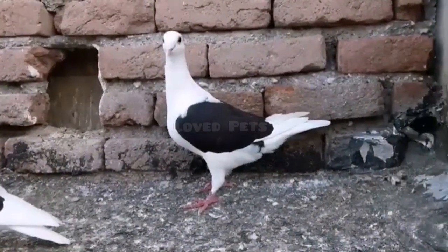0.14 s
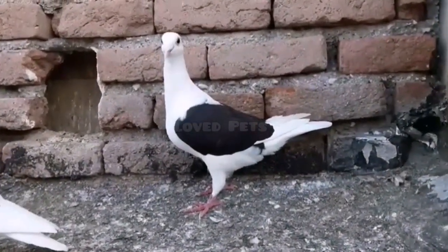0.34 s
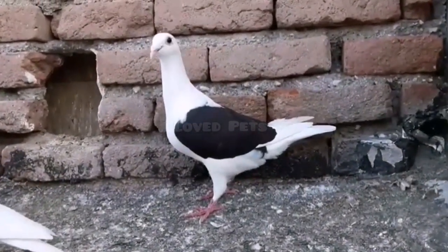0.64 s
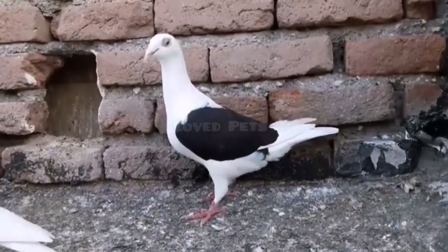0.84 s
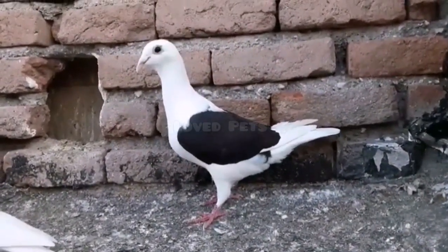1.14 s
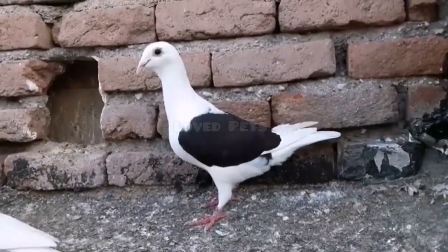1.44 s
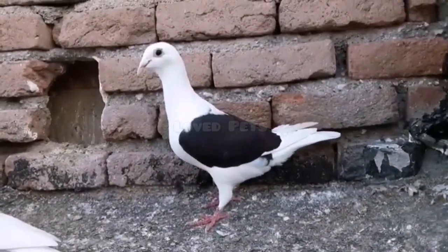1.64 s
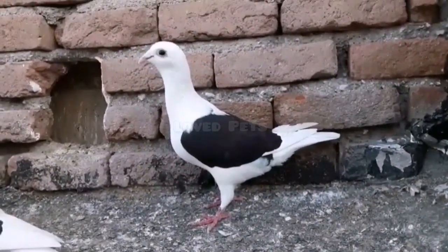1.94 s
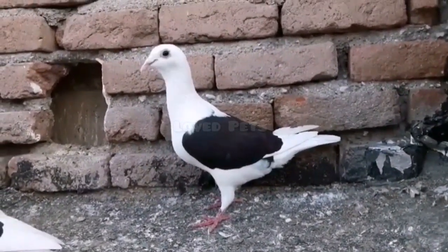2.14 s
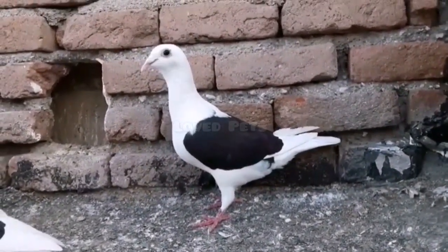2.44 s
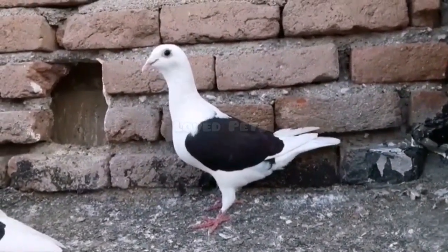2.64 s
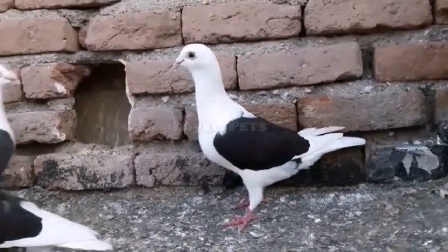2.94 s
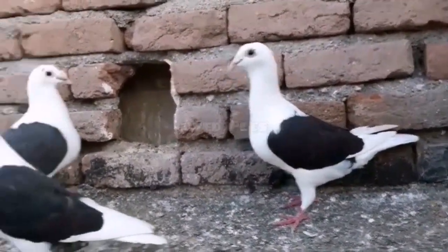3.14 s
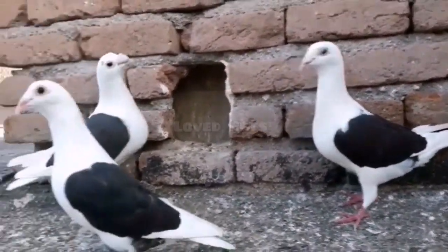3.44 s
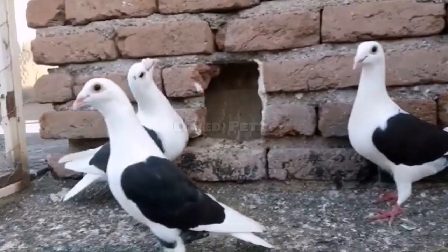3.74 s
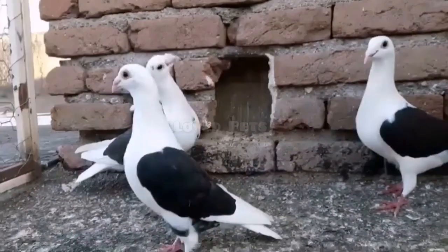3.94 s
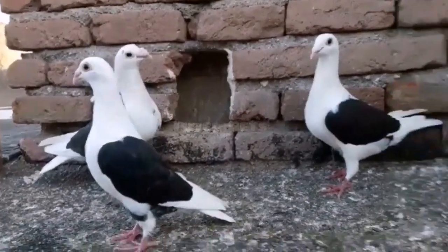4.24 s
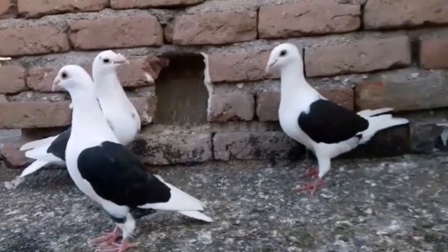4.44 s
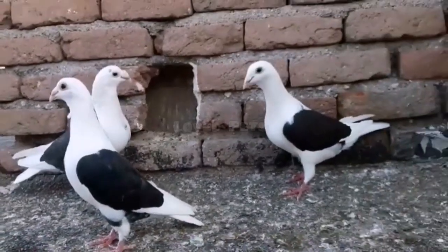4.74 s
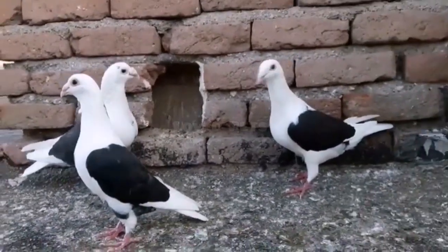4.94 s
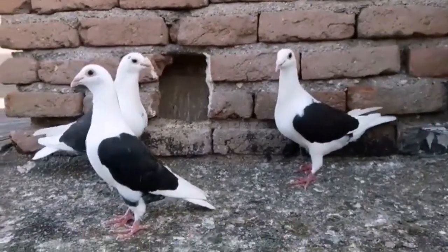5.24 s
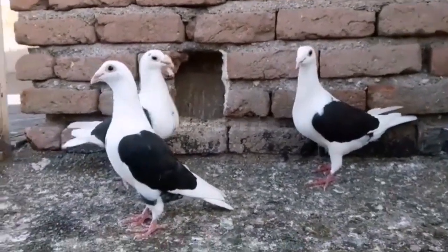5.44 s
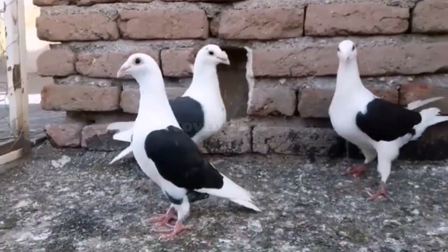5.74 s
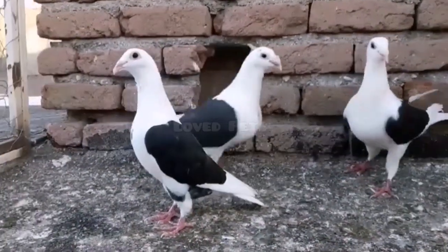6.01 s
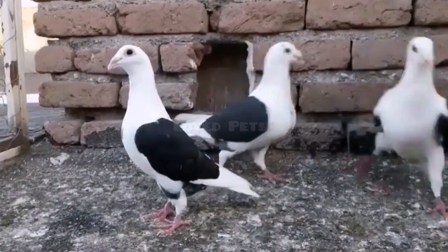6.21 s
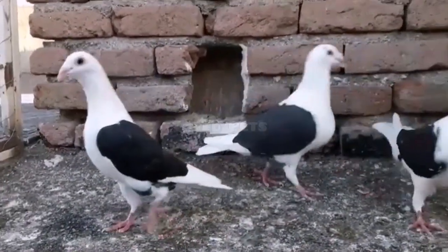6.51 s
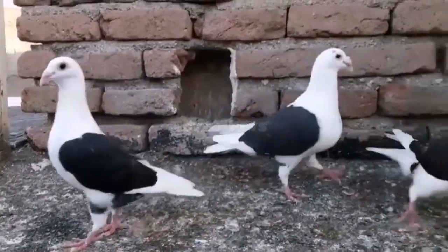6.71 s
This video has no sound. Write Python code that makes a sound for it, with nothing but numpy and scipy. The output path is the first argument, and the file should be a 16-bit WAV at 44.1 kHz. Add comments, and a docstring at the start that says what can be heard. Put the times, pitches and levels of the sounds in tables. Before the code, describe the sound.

An outdoor yard with faint town hiss, a soft low electrical hum and a distant chattering flock, heard through one wind-exposed microphone. From 0 to 0.8 s short throaty pigeon grunts come among sparrow chirps and faint far dove hoots. Gritty foot ticks cluster around 0.9-1.05 s as a clear low note glides, then a throbbing coo rolls from 1.05 to 1.8 s, with a small wind bump near 1.4. Grunts follow at 1.8-2.9 s, with a gliding note around 2.4 and a faint distant whine. A strong rolling coo fills 3.0-3.6 s. Wind thuds and slaps rise from 3.6, heaviest near 4.8 and 5.7. Softer rolls come at 4.7, 5.4-5.95 and 6.3-6.6 s, with a stout grunt at 6.15. Sparrows chirp throughout; a tiny nasal squeak and a grit scratch close near 6.8 s.

```python
"""Pigeons coo by a brick wall: throbbing tones roll, clear tones glide, short puffs grunt and far doves hoot.
Swept whistles make sparrow chirps and, scattered at random, a chattering flock behind them.
Grit ticks under small feet as bursts of noise; a sine hums like a transformer, a far whine and a squeak pass.
Gusts of wind buffet a single microphone as swelling low noise and sharp slaps, over the hiss of a far town."""
import sys
import numpy as np
from scipy import signal
from scipy.fft import rfft, irfft, next_fast_len
from scipy.io import wavfile
from scipy.ndimage import uniform_filter1d, map_coordinates

SR = 44100
rng = np.random.default_rng(int(sys.argv[2]) if len(sys.argv) > 2 else 0)


def store_wav(level_fs):
    """Save 16-bit WAV to argv[1]."""
    pcm = np.round(np.clip(np.atleast_2d(level_fs), -1, 1) * 32767)
    wavfile.write(sys.argv[1], SR, pcm.T.astype(np.int16))


N = 302967
T = np.arange(N) / SR


def amp(db):
    """Gain of a dB value."""
    return 10 ** (np.asarray(db) / 20)


def unit(x):
    """Scaled to rms 1."""
    return x / np.sqrt(np.mean(x ** 2) + 1e-20)


def curves(rows, t=T):
    """One value per sample for each column after the time."""
    s, *cols = np.transpose(rows)
    return [np.interp(t, s, c) for c in cols]


def wobble(rate, size=N):
    """A smooth random curve through rate knots a second."""
    knots = rng.standard_normal(int(size * 200 / SR) + 4)
    return map_coordinates(knots, [np.arange(size) * rate / SR])


def smooth_noise(size, width):
    """Random jitter of rms 1, averaged over width samples."""
    return unit(uniform_filter1d(rng.standard_normal(size), size=width))


def filtered(x, response):
    """x times a response of frequency."""
    m = next_fast_len(len(x) + 8192)  # silence at the end keeps the filter from wrapping round
    return irfft(rfft(x, m) * response(np.fft.rfftfreq(m, 1 / SR)), m)[:len(x)]


def shape(points):
    """Gain curve through (f/Hz, level/dB) points joined on a log axis."""
    f, db = np.transpose(points)
    return lambda hz: amp(np.interp(np.log(hz + 1), np.log(f + 1), db))


def noise(points):
    """Coloured noise of rms 1."""
    return unit(filtered(rng.standard_normal(N), shape(points)))


def add(track, s, sound):
    """Mixes a sound into a track at s seconds."""
    part = track[round(s * SR):][:len(sound)]
    part += sound[:len(part)]


def span(rows, fade):
    """Times of a call and its soft edges, fade seconds long."""
    t = np.arange(rows[0][0], rows[-1][0], 1 / SR)
    return t, np.clip(np.minimum(t - t[0], t[-1] - t) / fade, 0, 1)


def tone(hz):
    """A sine of rms 1 that follows a pitch curve."""
    return np.sqrt(2) * np.sin(2 * np.pi * (np.cumsum(hz) / SR + rng.random()))


def echoes(x, t60, wet_db):
    """The sound plus a noise tail that decays by 60 dB in t60 seconds, as walls return it."""
    t = np.arange(SR // 2) / SR
    tail = rng.standard_normal(len(t)) * amp(-60 * t / t60) * (t > .004)
    return x + amp(wet_db) * signal.fftconvolve(x, tail / np.linalg.norm(tail))[:len(x)]


def swells(rows, edge):
    """Summed gain of (middle, half length, dB) bumps; a higher edge makes them steeper."""
    return sum(amp(db) * np.exp(-np.abs((T - s) / half) ** edge) for s, half, db in rows)


def chirp(length, first_hz, last_hz):
    """A whistle; the wider its sweep, the hoarser it warbles."""
    u = np.linspace(0, 1, int(length * SR))
    hoarse = .55 + 1.5 * abs(np.log(last_hz / first_hz))
    warble = 1 + hoarse * (.015 * wobble(160, len(u)) + .033 * smooth_noise(len(u), 70))
    rasp = unit(amp(3 * hoarse * wobble(190, len(u))))
    envelope = np.sin(np.pi * u) ** 0.51 * amp(-4.5 * hoarse * u ** 3)
    return envelope * rasp * tone((first_hz + (last_hz - first_hz) * u) * warble)


def notes(calls, waver, tremor_db, wet_db):
    """Clear notes: one nearly pure, slightly wavering tone each, with echo."""
    out = np.zeros(N)
    for rows in calls:
        t, edge = span(rows, fade=0.0055)
        hz, db = curves(rows, t)
        level = edge * amp(db + tremor_db * wobble(55.0, len(t)))
        add(out, t[0], level * tone(hz * (1 + waver * wobble(30.34, len(t)))))
    return echoes(out, t60=0.46, wet_db=wet_db)


# gusts on the microphone: middle t/s, half length t/s, push level/dB, flutter level/dB relative to the push
GUSTS = [(0.26, 0.056, -36.5, -36), (1.29, 0.037, -36, -16), (1.442, 0.052, -28, -15),
         (1.683, 0.082, -38, -36), (3.14, 0.11, -39.5, -30), (3.62, 0.094, -32, -8.5),
         (3.914, 0.098, -22, -12.5), (4.103, 0.076, -22.5, -18.5), (4.328, 0.093, -31.5, -7),
         (4.563, 0.054, -20, -12.5), (4.784, 0.06, -14, -11), (5.099, 0.023, -25.5, -32),
         (5.345, 0.05, -25.5, -13), (5.665, 0.02, -15, -16), (5.757, 0.056, -21, -21),
         (5.885, 0.06, -20, -13), (6.261, 0.065, -25, -29), (6.38, 0.021, -36, -28),
         (6.521, 0.048, -26.5, -10), (6.633, 0.049, -22, -14.5), (6.805, 0.049, -30.5, -28)]
# single slaps of air on the diaphragm: t/s, peak level/dB
SLAPS = [(1.436, -30), (3.851, -30), (4.0356, -20.5), (4.0979, -26.5), (4.622, -18.5), (4.733, -27),
         (4.7696, -15.5), (4.7933, -13.5), (5.149, -25), (5.255, -17.5), (5.261, -19), (5.701, -9),
         (5.88, -31)]
# breeze between the gusts: t/s, level/dB
BREEZE = [(0, -43), (1.0, -39), (1.8, -40.5), (2.4, -41), (3.4, -41.5), (3.8, -42), (5.2, -33),
          (6.87, -39.5)]
# spectrum of the slow push, relative: f/Hz, level/dB per Hz
BUFFET = [(15, -18.5), (35, 4.5), (55, 1.5), (90, -9.5), (140, -25), (300, -82)]
# spectrum of the faster flutter, relative: f/Hz, level/dB per Hz
FLUTTER = [(50, -46), (90, -0.5), (130, -1.5), (200, -7.5), (350, -24), (700, -40), (1500, -62),
           (4000, -92)]
GUST_EDGE = 3.5  # steepness of a gust's rise and fall
BREEZE_FLUTTER_DB = -12.5  # relative to the breeze
SLAP_S, SHAKE_S, SHAKE_DB = 0.0013, 0.022, -13.5  # width of a slap; half length and gain of its flutter


def wind():
    """Eddies push the diaphragm in lumps; faster flutter rides on gusts and shakes around single slaps."""
    breeze = amp(curves(BREEZE)[0])
    strength = breeze + swells([row[:3] for row in GUSTS], GUST_EDGE)
    sharp = amp(BREEZE_FLUTTER_DB) * breeze
    sharp = sharp + swells([(s, half, db + rel_db) for s, half, db, rel_db in GUSTS], GUST_EDGE)
    sharp = sharp + swells([(s, SHAKE_S, db + SHAKE_DB) for s, db in SLAPS], 0.95)

    lumps_db = 4.7 * wobble(18)
    eddies = noise(BUFFET)
    # dividing by the swing evens out the diaphragm's flapping
    swing = np.abs(signal.hilbert(eddies, next_fast_len(N))[:N]) + .3
    push = unit(eddies / swing ** 0.43 * amp(0.32 * lumps_db))
    flutter = unit(noise(FLUTTER) * amp(0.63 * lumps_db + 3.1 * wobble(45)))

    slaps, t = np.zeros(N), np.arange(-SR // 50, SR // 50) / SR
    u = t / SLAP_S
    pulse = -(1 - u * u) / (1 + u * u) ** 2 * np.hanning(len(t))
    for s, peak_db in SLAPS:
        add(slaps, s + t[0], amp(peak_db) * pulse)
    return strength * push + sharp * flutter + slaps


# far town and air, relative spectrum: f/Hz, level/dB per Hz
YARD = [(65, -49), (110, -7.5), (149, -16), (280, -12), (373, -10.5), (466, -17), (759, -24), (2180, -31),
        (4100, -29), (7710, -39.5), (13100, -43.5), (14200, -43)]
YARD_DB = -50.5  # rms, give or take a tiny drift


def yard():
    """The far town: hiss in shifting patches of time and pitch, at an almost steady level."""
    z = signal.stft(noise(YARD), nperseg=512)[2]
    across_pitch = uniform_filter1d(rng.standard_normal(z.shape), size=7, axis=0)
    patches = unit(uniform_filter1d(across_pitch, size=8, axis=1))
    hiss = signal.istft(z * amp(2.3 * patches), nperseg=512)[1][:N]
    return amp(YARD_DB + 0.043 * wobble(1.52)) * unit(hiss)


# transformer hum, before its drift: f/Hz, level/dB rms
HUM = [(99.5, -46)]


def hum():
    """A mains line: one sine, slightly unsteady in pitch and level."""
    return sum(amp(db + 2.4 * wobble(12)) * tone(hz * (1 + 0.0054 * wobble(2.99))) for hz, db in HUM)


# chattering flock: t/s, low chatter level/dB, high chatter level/dB
FLOCK = [(0.0, -61.5, -64.5), (6.1, -62.5, -69), (6.87, -59.5, -54.5)]


def chatter(level_db, centre_hz, spread, fall, count):
    """Many far birds at random moments, each call falling in pitch, with strong echo."""
    out = np.zeros(N)
    for when, pitch, size, length in rng.random((count, 4)):
        hz = centre_hz * (1 + spread * (2 * pitch - 1))
        call = chirp(.025 + .05 * length, hz * (1 + fall), hz * (1 - fall))
        add(out, when * N / SR, amp(12 * size) * call)
    return amp(level_db) * unit(echoes(out, t60=.3, wet_db=-2))


def flock():
    """Low falling calls and high, nearly level peeps."""
    low_db, high_db = curves(FLOCK)
    low = chatter(low_db, 3850, .12, 0.1185, count=220)
    return low + chatter(high_db, 5600, 0.14, 0.039, count=200)


# grit ticks: t/s, scratch level/dB before its fade, knock level/dB relative to the scratch, scratch centre f/Hz
TICKS = [(0.029, -49, -21, 6300), (0.396, -52.5, 8, 5860), (0.87, -44.5, -18, 6350),
         (0.9795, -37.5, -2, 6200), (0.9805, -47, -11, 12500), (0.996, -38, -6, 6100),
         (1.05, -47, -17, 6240), (1.343, -52, -17, 6350), (2.5234, -53.5, -4, 9640),
         (2.8893, -58, -2, 8360), (3.542, -60.5, 15.5, 6570), (3.705, -55.5, 10.5, 8100),
         (4.301, -55, 11, 6250), (4.553, -58, 15.5, 7200), (4.7, -48, -16, 3900), (4.9446, -54.5, 6, 12000),
         (5.3585, -54, 7, 7320), (5.5883, -41.5, -1, 5800), (5.7931, -52, 5, 11800),
         (6.8498, -44.5, 8, 10800), (6.848, -36, -18, 1300)]
# shuffle of feathers and feet, before its flicker: middle t/s, half length t/s, level/dB
RUSTLE = [(.02, 0.045, -57.5), (.9, 0.039, -53.5), (1.012, 0.034, -47.5), (3.42, 0.28, -56),
          (5.48, 0.024, -55), (5.615, 0.032, -53), (6.81, 0.082, -53.5)]
# spectrum of shuffle and faint grains, relative: f/Hz, level/dB per Hz
GRIT = [(900, 9.5), (1800, 3.5), (3000, 5), (6000, 2.5), (10000, -6), (14000, -11.5)]
STIR_DB = -72.5  # constant faint stirring, before its flicker


def ticks():
    """Grit scratches around its own pitch with a duller knock; feet shuffle, and faint grains fall by chance."""
    out, t = np.zeros(N), np.arange(SR // 8) / SR
    for s, db, body_db, hz in TICKS:
        scratch = filtered(rng.standard_normal(len(t)), lambda f: 1 / (1 + ((f - hz) / (0.17 * hz)) ** 2))
        dull = shape([(500, 3), (1100, 6.5), (2600, 8.0), (8000, -8.5)])
        knock = filtered(rng.standard_normal(len(t)), dull)
        fade = amp(db - 60 * t / 0.068) * (1 - np.exp(-t / 0.002))
        add(out, s, fade * (unit(scratch) + amp(body_db) * unit(knock)))

    flicker_db = 2.1 * wobble(120) + 2.7 * smooth_noise(N, 40)
    shuffle = (amp(STIR_DB) + swells(RUSTLE, edge=1.3)) * amp(flicker_db)
    for when, size in rng.random((90, 2)):
        grain = np.exp(-((t - .02) / .005) ** 2)
        add(shuffle, when * N / SR, amp(-72 + 15 * size ** 3) * grain)
    return out + shuffle * noise(GRIT)


# sparrow chirps: t/s, length t/s, first f/Hz, last f/Hz, level/dB before envelope and echo
CHIRPS = [(0.017, 0.091, 4240, 3340, -54), (0.316, 0.059, 6100, 6150, -56), (0.692, 0.082, 4600, 3230, -48),
          (0.796, 0.066, 5910, 4800, -53), (0.855, 0.074, 4270, 3800, -57),
          (1.187, 0.041, 6030, 6130, -51.5), (1.186, 0.022, 5700, 5600, -51),
          (1.266, 0.013, 5530, 5670, -50), (1.32, 0.093, 4340, 3870, -56.5),
          (1.416, 0.051, 6030, 6590, -54.5), (1.651, 0.091, 4530, 3310, -60),
          (1.903, 0.035, 4300, 4100, -62), (1.485, 0.086, 4680, 3070, -49), (2.22, 0.078, 4580, 3200, -45),
          (2.228, 0.048, 5660, 4920, -50.5), (3.056, 0.092, 4690, 2880, -48.5),
          (3.38, 0.06, 5780, 4200, -49.5), (3.47, 0.034, 3700, 4500, -54),
          (3.818, 0.066, 4540, 3165, -49.5), (4.18, 0.029, 4210, 3580, -56),
          (4.466, 0.072, 4300, 3460, -56), (4.755, .012, 5860, 5670, -56),
          (4.724, 0.063, 4400, 3280, -52.5), (5.065, 0.023, 4970, 5230, -58),
          (5.084, 0.086, 4200, 3400, -57.5), (5.23, 0.024, 6150, 6200, -57),
          (5.388, 0.048, 5440, 5780, -52), (5.433, 0.031, 4310, 4010, -50),
          (5.511, 0.079, 4370, 3260, -48.5), (5.682, 0.11, 4340, 2810, -61), (5.88, 0.042, 6400, 6400, -63),
          (5.912, 0.044, 5600, 5000, -63), (5.986, 0.055, 5800, 5700, -64), (6.06, .015, 5500, 4900, -55),
          (6.192, .05, 4300, 3280, -60), (6.046, 0.074, 4390, 3170, -56), (6.307, 0.086, 4680, 2930, -49),
          (6.383, 0.031, 3890, 4100, -51), (6.5, 0.027, 6090, 6230, -56), (6.619, 0.044, 5900, 6480, -57.5),
          (6.761, 0.049, 5820, 5060, -58), (6.817, 0.048, 4200, 3980, -50)]


def sparrows():
    """The nearer birds, blurred by the walls of the yard; high chirps ring shorter."""
    out = np.zeros(N)
    for s, length, first_hz, last_hz, db in CHIRPS:
        call = np.pad(chirp(length, first_hz, last_hz), (0, SR // 2))  # room for the echo
        ring_s = .4 * (3800 / max(last_hz, 3800)) ** 3
        add(out, s, amp(db) * echoes(call, t60=ring_s, wet_db=-2.5))
    return out


# short grunts: t/s, level/dB at the height of the puff before echo, starting f/Hz
GRUNTS = [(0.238, -47.5, 394), (0.44, -48.5, 377), (0.608, -45.5, 420), (0.671, -46, 244),
          (0.784, -48, 413), (1.811, -44.5, 357), (1.857, -56, 353), (2.02, -44, 392), (2.158, -37.5, 279),
          (2.186, -46, 390), (2.531, -42.5, 400), (2.573, -47, 359), (2.642, -47, 302), (2.676, -42.5, 376),
          (2.882, -38.5, 384), (5.329, -42.5, 373), (5.979, -44, 406), (6.161, -36, 325)]


def grunts():
    """One puff of breath rings the throat for a few cycles, sinking in pitch."""
    out, t = np.zeros(N), np.arange(SR // 10) / SR
    u = t / 0.0048  # the puff peaks after 4.8 ms
    for s, db, hz in GRUNTS:
        add(out, s, amp(db) * u * np.exp(1 - u) * tone(hz * (1 - 1.7 * t)))
    return echoes(out, t60=0.23, wet_db=0.5)


# hoots of far doves: t/s, length t/s, nominal f/Hz, level/dB before tremor and echo
HOOTS = [(.3, 0.049, 514, -58), (.39, 0.11, 512, -54.5), (1.89, 0.071, 519, -55), (1.95, 0.15, 603, -58.5),
         (2.95, 0.11, 511, -52), (3.48, 0.054, 538, -55), (3.58, 0.11, 519.4, -55),
         (3.84, 0.063, 590, -55.5), (4.18, 0.12, 580, -56.5), (5.1, .12, 504, -56),
         (6.13, 0.11, 526, -55.5), (6.52, 0.15, 561, -60), (6.68, 0.047, 569, -58),
         (6.72, 0.19, 519, -57.5)]


def doves():
    """Each hoot sinks from a tenth above its nominal pitch to just below it."""
    calls = [[(s, 1.1 * hz, db), (s + length, .985 * hz, db)] for s, length, hz, db in HOOTS]
    return notes(calls, waver=.012, tremor_db=1.5, wet_db=-8)


# clear gliding notes of near pigeons, one list a note: t/s, f/Hz, level/dB, before waver, tremor and echo
GLIDES = [
    [(.9, 268.5, -43), (.95, 235.2, -41.5), (1.0, 273.4, -43.5), (1.08, 278.6, -43), (1.13, 233.3, -44.5),
     (1.19, 317, -49), (1.26, 335, -42)],
    [(1.66, 302.8, -50), (1.74, 259.5, -49.5), (1.83, 207, -50)],
    [(2.31, 260, -44), (2.35, 238, -40), (2.39, 241, -39), (2.43, 296.5, -41.5), (2.49, 295, -40.5),
     (2.55, 212, -50)],
    [(2.88, 363.3, -49), (2.93, 322.6, -39), (3.0, 291.5, -42), (3.08, 257.5, -44), (3.18, 214, -44.5),
     (3.25, 184.4, -49)],
    [(6.62, 206.6, -52), (6.67, 222.7, -43.5), (6.76, 210, -58)],
]


def glides():
    """Near pigeons' clear notes: a wavering tone slides along each pitch curve."""
    return notes(GLIDES, waver=.026, tremor_db=2.8, wet_db=-11)


# rolling coos, one list a call: t/s, f/Hz before throb jitter, level/dB before the throat filter
ROLLS = [
    [(1.043, 361, -41), (1.08, 384.3, -39.5), (1.15, 351, -46.5), (1.2, 350, -37), (1.23, 333, -59)],
    [(1.233, 345, -39), (1.265, 364.3, -32.5), (1.38, 400, -34.5), (1.46, 390.6, -35.5), (1.52, 357, -35),
     (1.56, 346, -31), (1.67, 348.7, -33.5), (1.73, 303, -42.5), (1.78, 285, -52)],
    [(3.0, 368, -37), (3.033, 381.5, -29), (3.1, 409.5, -37.5), (3.19, 402.5, -41.5), (3.235, 395, -33.5),
     (3.28, 380, -39), (3.3, 368.4, -30), (3.39, 347, -34), (3.46, 311, -38.5), (3.58, 239, -49)],
    [(4.678, 363, -54), (4.715, 366, -39.5), (4.85, 387.4, -42.5), (4.93, 377, -44), (5.02, 329, -56)],
    [(5.41, 365, -40), (5.44, 388, -34), (5.55, 407, -47), (5.65, 398, -38), (5.78, 352, -43),
     (5.86, 305, -35.5), (5.95, 279, -50.5)],
    [(6.283, 372, -32), (6.315, 367, -36), (6.42, 368, -40), (6.56, 349, -41.5), (6.62, 300, -59)],
]
# mean throb rate of each rolling coo: f/Hz
THROBS_PER_S = [26.4, 28.88, 26.42, 25.3, 25.93, 26.82]
FIRST_THROB_S = 0.033  # nominal delay of the first throb
DOUBLES_BY = 0.38  # share of the call that scales the growth of the throbs in between


def rolls():
    """The syrinx never quite shuts: uneven throbs ride on a murmur and double up, inside the swollen throat."""
    out = np.zeros(N)
    for rows, rate in zip(ROLLS, THROBS_PER_S):
        t, edge = span(rows, fade=0.0093)
        hz, db = curves(rows, t)
        uneven_rate = rate * (1 + .085 * wobble(25, len(t)))
        beat = np.cumsum(uneven_rate) / SR + .5 - rate * FIRST_THROB_S

        # each throb draws its own pitch and polarity; those in between also their size
        each = rng.standard_normal((99, 2))[np.round(2 * beat).astype(int)]
        between = np.clip((t - t[0]) / (t[-1] - t[0]) / DOUBLES_BY, .3, .75)
        main_throb = np.sin(np.pi * beat) ** 8
        extra_throb = between * amp(2.5 * each[:, 0]) * np.cos(np.pi * beat) ** 8
        throb = (.07 + main_throb + extra_throb) * amp(2.2 * wobble(50, len(t)))

        bend = .07 * np.sin(4 * np.pi * beat) + .045 * each[:, 0] + .03 * wobble(150, len(t))
        voice = throb * np.sign(each[:, 1] + .1) * tone(hz * (1 + bend))
        add(out, t[0], edge * amp(db) * unit(echoes(voice, t60=.12, wet_db=-9)))
    # the closed throat passes a narrow band
    return filtered(out, shape([(120, 2), (230, 3.0), (460, -4), (650, 0), (1200, -43)]))


# a faint far whine, before waver, tremor and echo: t/s, f/Hz, level/dB
DRONE = [(1.95, 934, -73), (2.2, 898, -68), (2.55, 883, -65), (3.0, 904, -70)]


def drone():
    """A faint far whine: one wavering tone with echo."""
    return notes([DRONE], waver=.03, tremor_db=3, wet_db=-3)


# squeak harmonics 1-4, one gain each: level/dB
SQUEAK_TONE = [7, 16, 4, 2]
SQUEAK_S, SQUEAK_LENGTH_S = 6.752, 0.031
SQUEAK_HZ, SQUEAK_SAG = 830, 0.03  # starting pitch; share it drops
SQUEAK_DB = -60  # before the harmonic gains


def squeak():
    """A brief nasal peep of four harmonics, sagging a little."""
    out, u = np.zeros(N), np.linspace(0, 1, int(SQUEAK_LENGTH_S * SR))
    hz = SQUEAK_HZ * (1 - SQUEAK_SAG * u + 0.012 * wobble(110, len(u)))
    level = np.sin(np.pi * u) * amp(SQUEAK_DB + 4.5 * wobble(140, len(u)))
    voice = sum(amp(db) * tone(hz * k) for k, db in enumerate(SQUEAK_TONE, start=1))
    add(out, SQUEAK_S, level * voice)
    return out


def scene():
    """Birds, grit, wind and background at one microphone."""
    background = wind() + yard() + hum() + drone()
    small_sounds = flock() + ticks() + sparrows() + squeak()
    pigeons = grunts() + doves() + glides() + rolls()
    return (background + small_sounds + pigeons)[None]


TOP_HZ = 14100


def record(dry):
    """The recorder keeps nothing above its band limit."""
    return filtered(dry[0], lambda hz: hz < TOP_HZ)[None]


dry = scene()
out = record(dry)
store_wav(out)
```